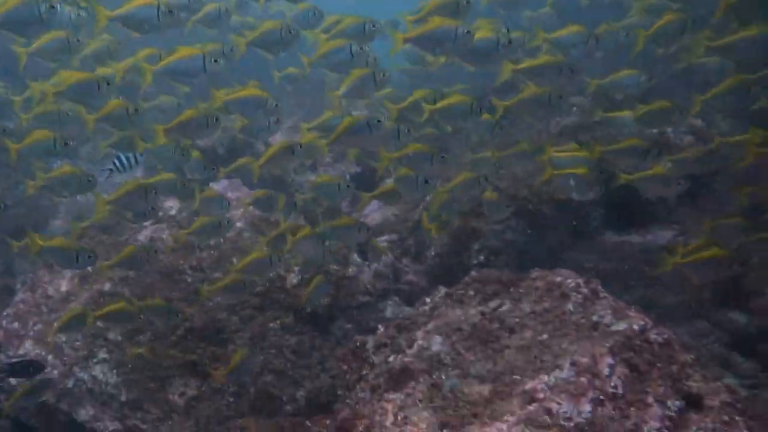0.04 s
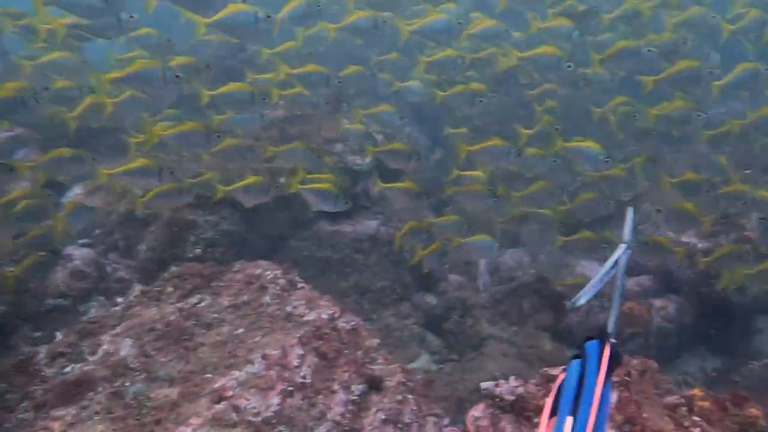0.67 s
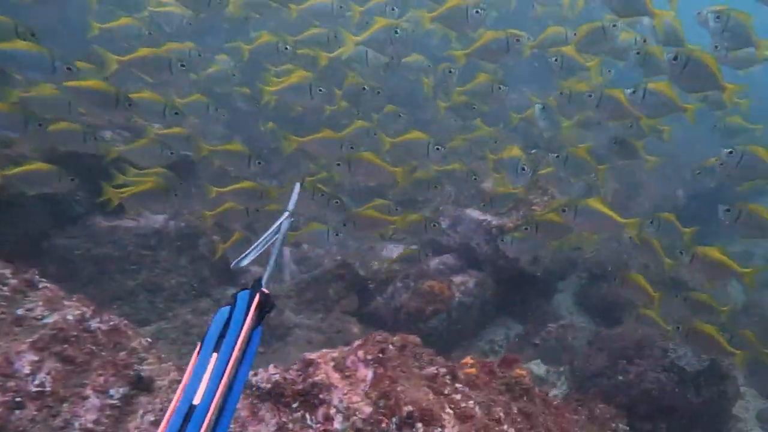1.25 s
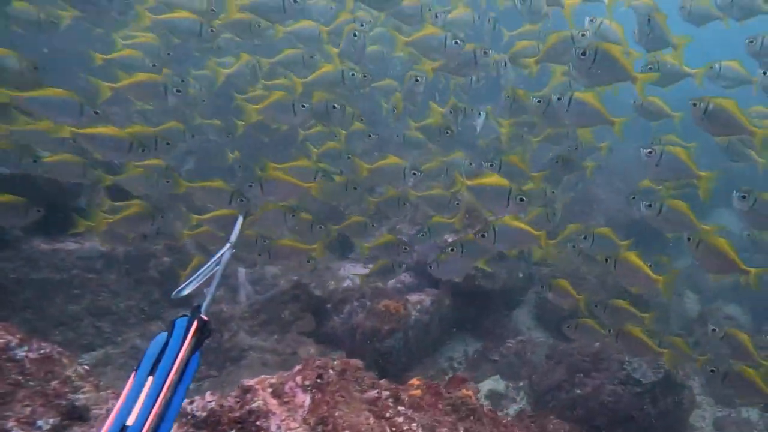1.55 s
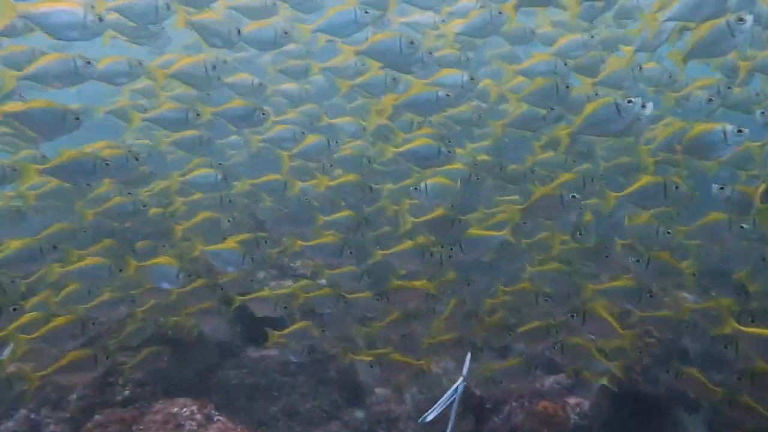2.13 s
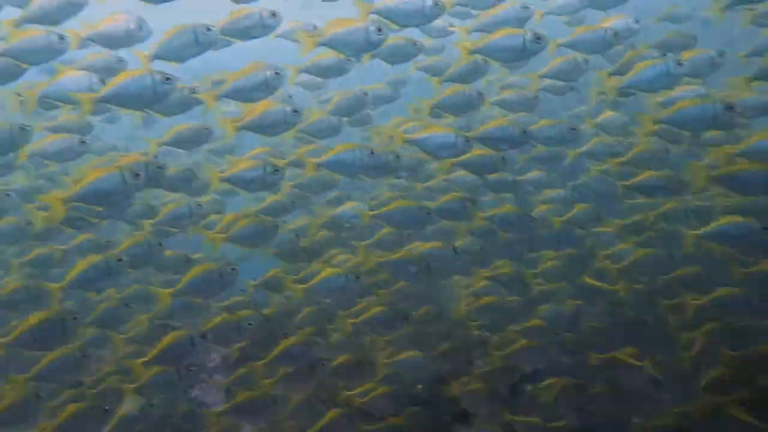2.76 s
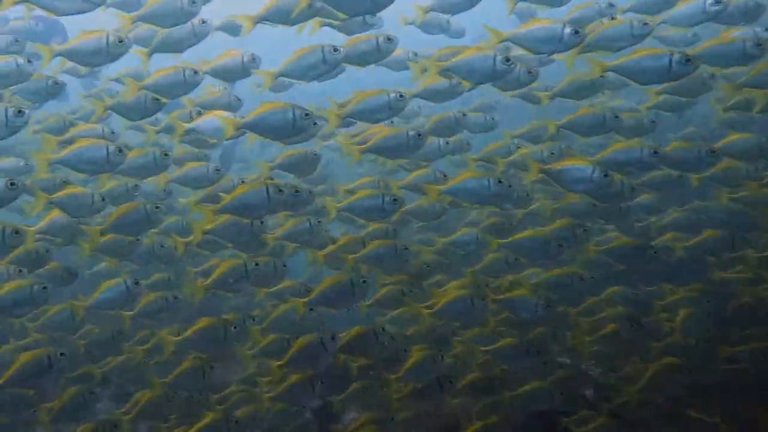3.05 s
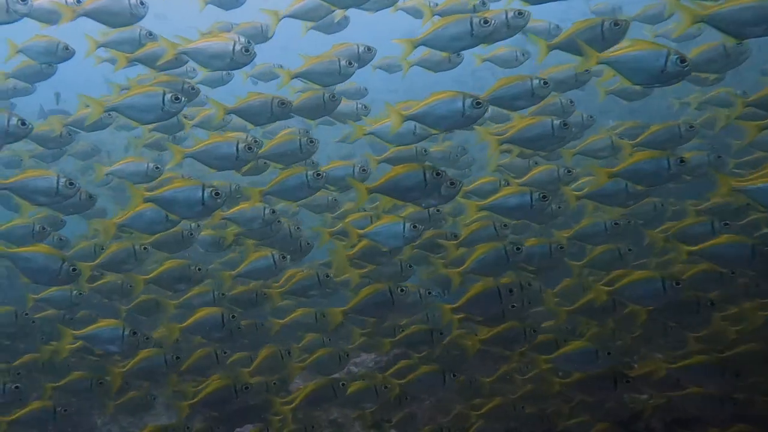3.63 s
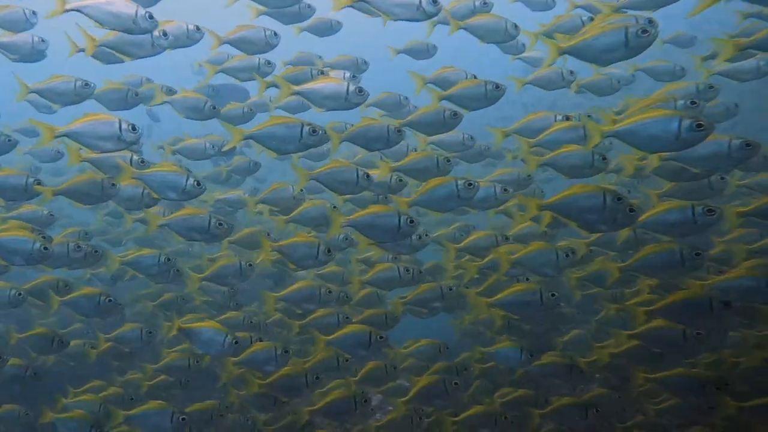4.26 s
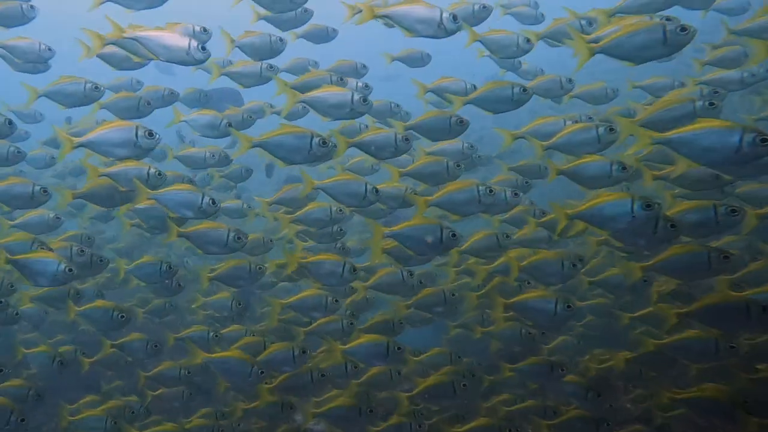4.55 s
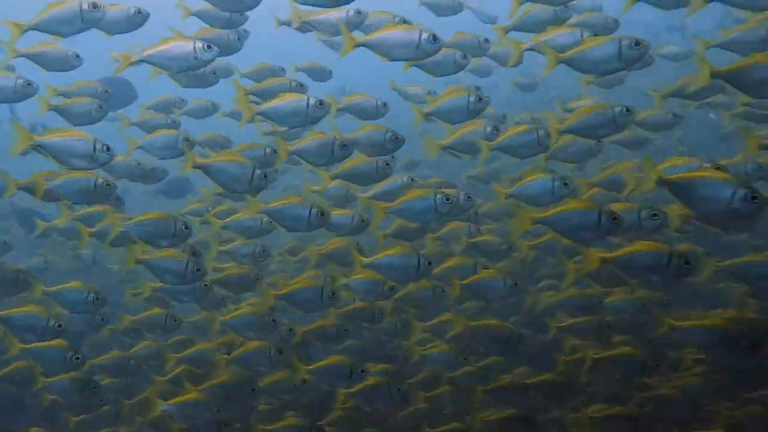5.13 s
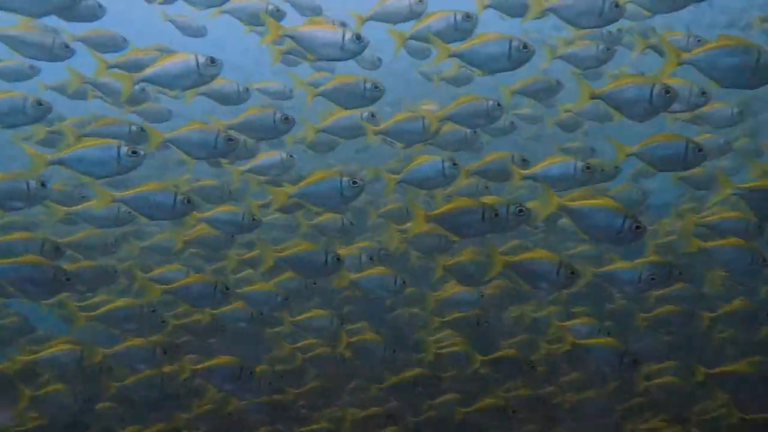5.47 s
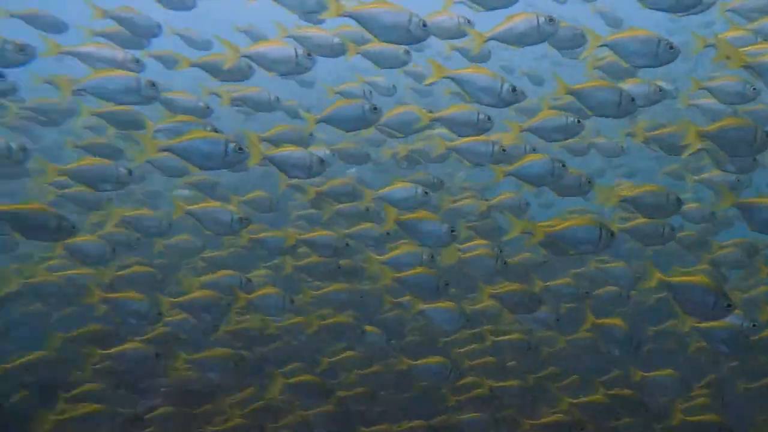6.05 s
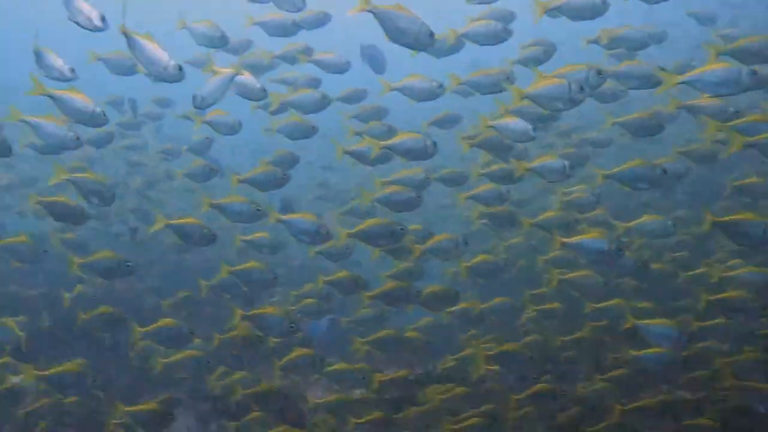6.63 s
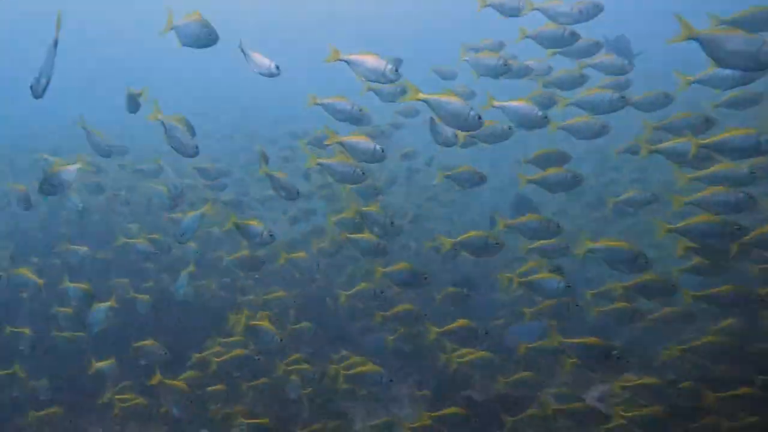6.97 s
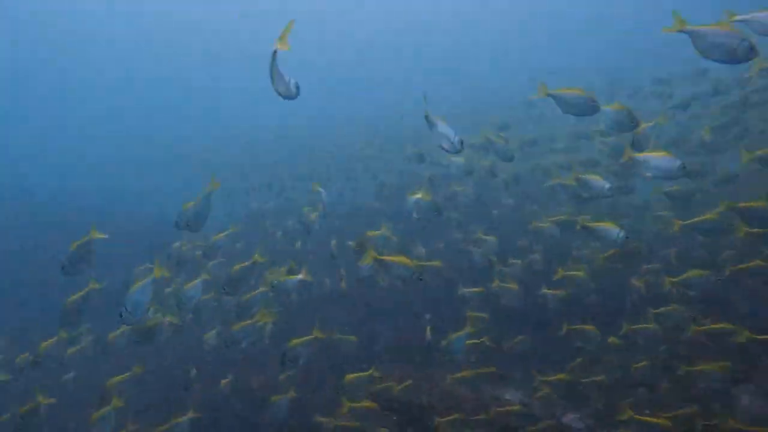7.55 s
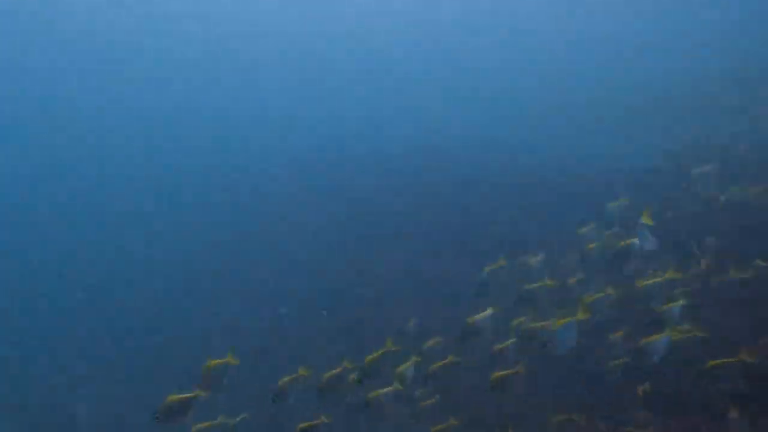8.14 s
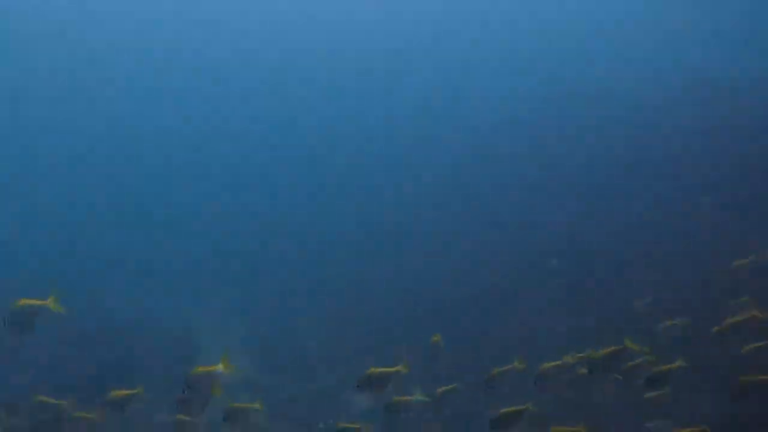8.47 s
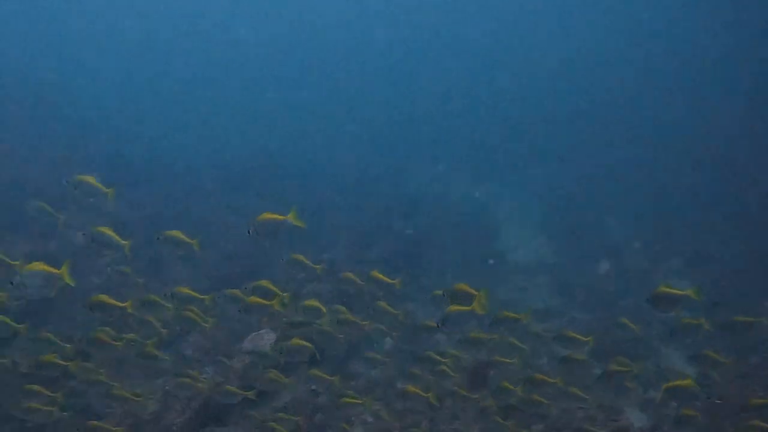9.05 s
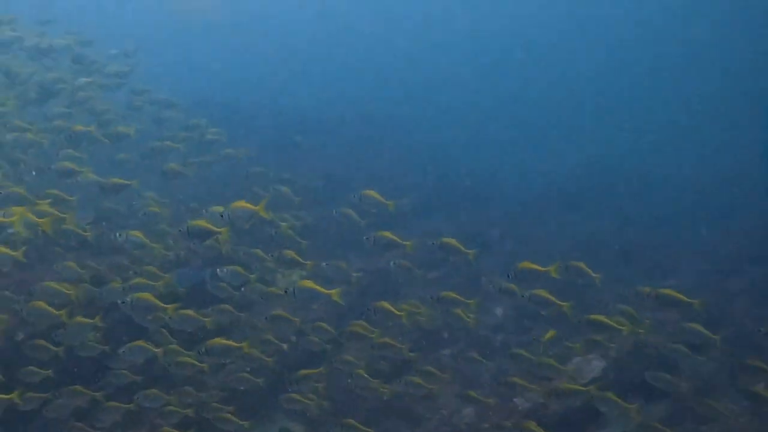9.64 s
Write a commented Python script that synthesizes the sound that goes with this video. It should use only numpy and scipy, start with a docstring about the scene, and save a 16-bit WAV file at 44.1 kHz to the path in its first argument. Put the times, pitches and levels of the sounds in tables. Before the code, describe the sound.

Shrimp crackle and snap underwater over low, muffled sloshing, with a few dull knocks, rubs and a faint warbling hum.

```python
"""Under water on a reef, heard through a diver's camera housing. Snapping shrimp crackle all round:
each snap is a collapsing bubble whose pressure pulse rings the resonances of the case wall.
Water sloshes and churns past the moving camera, and small ringing bubbles gurgle. Stick-slip rubs
and dull knocks come through the mount, light taps tick on the case, and a faint low hum warbles."""
import sys
import numpy as np
from scipy import signal
from scipy.fft import rfft, irfft, next_fast_len
from scipy.io import wavfile
from scipy.ndimage import uniform_filter1d, map_coordinates

SR = 44100
rng = np.random.default_rng(int(sys.argv[2]) if len(sys.argv) > 2 else 0)


def generate_wav(signal):
    """Clip the signal to [-1, 1] and save it as 16-bit WAV at the path in sys.argv[1]."""
    frames = np.transpose(np.atleast_2d(signal))
    scaled = np.clip(frames, -1, 1) * 32767
    pcm = np.round(scaled).astype(np.int16)
    wavfile.write(sys.argv[1], SR, pcm)


N = 432180

# rubs on the mount: (middle [s], length [s], level [dB], pitch [Hz], eddies relative to the rub [dB])
MOUNT_RUBS = [(0.123, 0.042, -40, 290, -11), (0.531, 0.027, -43, 278, 4), (0.609, 0.029, -47.5, 277, -4),
              (0.953, 0.037, -45, 274, -1), (1.055, 0.11, -40, 174.8, 3), (1.185, 0.26, -38, 162.5, -0.5),
              (1.289, 0.036, -47, 276, 0), (1.345, 0.11, -42, 152, 0), (1.652, 0.088, -45, 257.7, 1.5),
              (5.365, 0.037, -39, 240, -10), (7.667, 0.025, -51.5, 308, 7.5), (8.273, 0.02, -38, 277, -4),
              (8.345, .1, -50.5, 233, 9), (8.488, 0.038, -49, 266, 13), (9.54, 0.033, -49.5, 282, -2)]
RUB_TAPER = 0.44  # share of a rub spent swelling and fading


def amp(db):
    """Decibels to amplitude ratio."""
    return 10 ** (np.asarray(db) / 20)


def unit(x):
    """Normalisation to rms 1."""
    return x / np.sqrt(np.mean(x ** 2) + 1e-20)


def along(points, hz):
    """Interpolation of (frequency [Hz], value) points on a logarithmic axis."""
    f, v = np.transpose(points)
    return np.interp(np.log(hz + 1), np.log(f + 1), v)


def curve(points):
    """Linear interpolation of (time [s], value) points at every sample."""
    return np.interp(np.arange(N) / SR, *np.transpose(points))


def wobble(rate):
    """Smooth random modulation, rate knots a second."""
    return map_coordinates(rng.standard_normal(int(N * rate / SR) + 4), [np.arange(N) * rate / SR])


def swell(middle, length, taper):
    """A tapered window within the scene; taper is the share spent rising and falling."""
    inside = 1 - np.abs(np.arange(N) / SR - middle) / (length / 2)
    ramp = np.clip(inside / taper, 0, 1)
    return ramp * ramp * (3 - 2 * ramp)


def add(track, s, sound):
    """Superposition of a sound on the track from time s."""
    part = track[..., max(round(s * SR), 0):][..., :sound.shape[-1]]
    part += sound[..., :part.shape[-1]]


def filtered(x, response):
    """Linear filtering: the spectrum of x times a frequency response."""
    n = x.shape[-1]
    m = 2 * next_fast_len(n // 2 + 2048)
    return irfft(rfft(x, m) * response(np.fft.rfftfreq(m, 1 / SR)), m)[..., :n]


def coloured(x, spectrum):
    """Zero-phase filtering by (frequency [Hz], gain [dB]) points."""
    return filtered(x, lambda hz: amp(along(spectrum, hz)))


def causal(gain):
    """The minimum-phase response with this gain: it rings after a blow, never before."""
    cepstrum = irfft(np.log(np.maximum(gain, 1e-6)))
    half = len(cepstrum) // 2
    cepstrum[1:half] *= 2
    cepstrum[half + 1:] = 0
    return np.exp(rfft(cepstrum))


def resonance(hz, centre, width):
    """Gain of a steep-sided resonance."""
    return 1 / (1 + ((hz ** 2 - centre ** 2) / (width * hz + 1e-9)) ** 2)


def housing(hz, lowest_hz=1250):
    """Modal response of the wall at the two ports; stiffness blocks sound below the first mode."""
    # wall resonances: (frequency [Hz], width [Hz], left gain [dB], right gain [dB])
    modes = [(1590, 360, -8.5, -7.5), (2160, 430, -14, -14), (2780, 270, -7, -8), (3170, 450, 0, -10),
             (3910, 810, -6, -13), (4830, 1100, -16, -9), (5200, 470, -1.5, -4), (5790, 590, -13, -9),
             (6440, 740, -6, -5), (7430, 850, -4, -5), (8470, 750, -20, -19), (9680, 1270, -22, -22),
             (10990, 1730, -22, -26), (12770, 1990, -29, -30)]
    # the wall bends differently at the two ports: (frequency [Hz], left phase lead [rad])
    phase_lead = [(1000, -.9), (1350, -.1), (1800, -.4), (2200, -1.3), (3050, -1), (3400, 0), (3700, 3),
                  (4000, 4.7), (4700, 5.9), (5600, 2 * np.pi)]
    left = np.sqrt(sum((amp(db) * resonance(hz, c, w)) ** 2 for c, w, db, _ in modes)) + 1e-9
    right = np.sqrt(sum((amp(db) * resonance(hz, c, w)) ** 2 for c, w, _, db in modes)) + 1e-9
    stiffness = np.minimum(hz / lowest_hz, 1) ** 2
    right_over_left = right / left * np.exp(-1j * along(phase_lead, hz))
    return causal(left * stiffness) * np.array([np.ones_like(hz), right_over_left])


def through_wall(pair):
    """Transmission of two incoherent drives: one shared by the ports, one in antiphase."""
    # antiphase drive: (frequency [Hz], side relative to mid [dB])
    side_spectrum = [(1000, 1.5), (1600, -12), (3000, -5), (5200, -14.5), (7500, -17), (9500, -10),
                     (13000, -2.5)]
    mid, side = pair[:1], coloured(pair[1:], side_spectrum)
    return filtered(mid + side * [[1], [-1]], housing)


def snap_envelope(t, rise_s=0.00012, burst_t60=0.0087, rocks_t60=0.22, surface_s=.015, surface_t60=0.027):
    """Cavitation: a collapsing bubble's burst, its scatter off rocks and its smeared surface echo."""
    burst = amp(-60 * t / burst_t60)
    rocks = amp(-26 - 60 * t / rocks_t60)
    surface = (t > surface_s) * amp(-19 - 60 * np.abs(t - surface_s) / surface_t60)
    return (1 - np.exp(-t / rise_s)) * (burst + np.hypot(rocks, surface))


def reef_crackle(snaps_per_s=430, spread_db=7.5, flurry_db=2, colour_db=2.5, gain_db=1):
    """Incoherent summation: snaps at all distances add in energy, and the farthest merge into hiss."""
    # distant crackle: (time [s], relative level [dB])
    levels = [(0.0, -44.5), (0.41, -46.5), (1.06, -43), (1.36, -45), (3.14, -42), (3.41, -40.5),
              (3.82, -43.5), (4.56, -41), (4.86, -42.5), (5.62, -41.5), (5.81, -43.5), (6.66, -41.5),
              (7.2, -43), (7.45, -40.5), (7.78, -43), (8.19, -41.5), (8.71, -43), (9.8, -40.5)]
    onsets = rng.random(N) < snaps_per_s / SR
    size = np.minimum(rng.standard_normal(N), 1.35)
    energy = onsets * amp(spread_db * size) ** 2
    energy_decay = snap_envelope(np.arange(SR // 25) / SR) ** 2
    bursts = np.sqrt(np.abs(signal.fftconvolve(energy, energy_decay)[:N]))
    flurries = amp(flurry_db * wobble(30)) * unit(bursts)
    hiss = amp(-1.5 + 0.68 * wobble(12))
    # small bubbles barely stir the lowest wall resonances
    noise = coloured(rng.standard_normal((2, N)), [(1700, -2.5), (2700, 0), (8000, 1)])
    dull = filtered(noise, lambda hz: along([(3800, 0.74), (5000, 0.019)], hz))
    tilt_db = colour_db * wobble(70)  # some snaps dull, some bright
    tilted = dull * amp(tilt_db) + (noise - dull) * amp(-.3 * tilt_db)
    crackle = through_wall(np.hypot(flurries, hiss) * tilted)
    return amp(curve(levels) + gain_db) * unit(crackle)


def flow(surge_stir_db=-27):
    """Slosh and churn amplitudes: drift and surges add in power; surges and rubs shed eddies."""
    # steady slosh: (time [s], relative level [dB])
    drift = [(0.0, -41.5), (0.84, -45), (1.47, -37.5), (4.2, -50.5), (9.31, -37.5), (9.8, -60)]
    # surges as the camera swings: (middle [s], length [s], relative level [dB])
    surges = [(0.2, 0.25, -29.5), (1.55, 0.16, -24), (1.856, 0.25, -35), (2.428, 0.26, -31.5),
              (5.78, .12, -42), (6.134, 0.46, -35), (8.26, 0.49, -39), (8.633, 0.19, -30),
              (9.183, 0.31, -27), (9.708, 0.41, -35.5)]
    # steady eddies: (time [s], relative level [dB])
    eddies = [(0, -48), (1.9, -47), (2.05, -47.5), (2.3, -50.5), (3.55, -46.5), (3.64, -54.5), (3.73, -48),
              (5.2, -49), (6.1, -50), (6.7, -47), (7.1, -50.5), (7.45, -47.5), (7.8, -46.5), (9.8, -45.5)]
    surge = sum(amp(db) * swell(middle, length, 0.9) for middle, length, db in surges)
    rubbing = sum(amp(db + stir_db) * swell(middle, length, RUB_TAPER)
                  for middle, length, db, _, stir_db in MOUNT_RUBS)
    slosh = np.hypot(amp(curve(drift)), surge)
    churn = np.hypot(amp(curve(eddies)), amp(surge_stir_db) * surge + rubbing)
    return slosh, churn


def water(slosh_db=1, churn_db=-1, lumps_db=4):
    """Turbulence round the moving camera: slow pressure swings and lumpy eddies."""
    # pressure swings: (frequency [Hz], spectral level [dB])
    slosh_spectrum = [(4, -6), (10, 10.5), (17, 4), (26, -6.5), (48, -8.5), (70, -32), (120, -63),
                      (300, -80)]
    # eddies: (frequency [Hz], spectral level [dB])
    churn_spectrum = [(35, -2), (60, 4), (90, 4), (125, 8), (170, 4), (250, -0.5), (310, -12), (380, -22),
                      (500, -32.5), (720, -30.5), (1100, -29.5), (2000, -31), (4000, -65), (8000, -110)]
    slosh, churn = flow()
    swings = unit(coloured(rng.standard_normal(N), slosh_spectrum))
    lumpy_noise = rng.standard_normal(N) * amp(lumps_db * wobble(35))
    eddies = unit(coloured(lumpy_noise, churn_spectrum))
    return amp(slosh_db) * slosh * swings + amp(churn_db) * churn * eddies


def wash(level_db=-64):
    """Ambient noise: a faint rush of water, uncorrelated between the ports."""
    # rush of water: (frequency [Hz], spectral level [dB])
    spectrum = [(20, -25), (50, 7), (150, 5.5), (300, 10.5), (500, 0), (1000, 2.5), (2000, -8)]
    return amp(level_db) * unit(coloured(rng.standard_normal((2, N)), spectrum))


def whitened(burst, bins=25):
    """Spectral whitening of a noise burst, since a collapse is one clean, broadband pulse."""
    spectrum = rfft(burst)
    power = np.abs(uniform_filter1d(np.abs(spectrum) ** 2, bins, axis=-1))
    return irfft(spectrum / np.sqrt(power + 1e-12), burst.shape[-1])


def neighbour_snaps(per_s=7, median_hz=5270, pitch_spread=0.48, focus_db=4):
    """A random point process: rows for near_snaps from shrimp a little farther off."""
    count = int(per_s * N / SR)
    rows = []
    for when, (loudness, low_ring, detune) in zip(rng.random(count), rng.standard_normal((count, 3))):
        s = when * (N / SR - .1)
        pitch = median_hz * np.exp(pitch_spread * detune)
        rows.append((s, -26.5 + loudness, -8 + 5 * low_ring, pitch, focus_db, 2.07 * pitch))
    return rows


def near_snaps(gain_db=-7, focus_width=0.32, leak_db=-15, treble_fade_db_per_s=3500):
    """Impulse excitation of the wall by single collapses; big, slow bubbles ring low, with little treble."""
    # nearest snaps and their strongest echoes: (time [s], relative level [dB], lift of the low ring [dB],
    # pitch [Hz], emphasis of that pitch [dB], upper edge [Hz])
    snaps = [(0.0511, -9.0, -5.5, 5200, 4.5, 10000), (0.0944, -20, -5, 3720, 7, 4700.0),
             (0.1111, -22.5, -5, 2550.0, 10, 15400.0), (0.1995, -16, -3, 7200, 5.5, 15600.0),
             (0.2757, -10.5, -8, 7540, 7.5, 7760), (0.454, -21, -14, 2830, 12, 7300.0),
             (0.5434, -16, 2, 3050.0, 7, 9500.0), (0.5643, -15.5, -5, 5400.0, 7, 14100.0),
             (0.7832, -30, 14.0, 2800, 0, 4000.0), (0.8396, -21.5, -1, 2750, 20, 3000.0),
             (0.9798, -23, -19, 7400, 21, 8000.0), (1.1072, -19.5, -21, 8300, 10.0, 15800.0),
             (1.1957, -12.5, -16, 2350.0, 8, 9300), (1.2089, -24, -14, 5400.0, 9, 7200.0),
             (1.2343, -31, 21, 4300.0, 9, 7400.0), (1.3488, -20.5, -8, 6950, 0, 9200.0),
             (1.7645, -21.0, -18.0, 7950.0, 11.0, 10200.0), (1.8448, -16.5, -13.0, 3020, 12.0, 6000.0),
             (1.8558, -14, 18.5, 3700.0, 14, 14800.0), (1.8668, -39, 3, 4350.0, 11, 5600.0),
             (1.9572, -18, -18.0, 5850.0, 7, 15700.0), (2.0417, -21.0, -11, 2850.0, 5.0, 15300.0),
             (2.0721, -22, -2, 5400.0, 5, 9300.0), (2.1107, -22.0, -3.0, 4400, -1, 6000.0),
             (2.2972, -20.5, -17.0, 3050.0, 5, 8300.0), (2.3597, -24, -8.0, 5500.0, 5.0, 7600.0),
             (2.3711, -15.0, -3, 7850.0, 6, 8600.0), (2.3851, -22.0, -7.0, 3450.0, 13, 8200.0),
             (2.5855, -17, -3, 7100.0, 5, 9300.0), (2.6065, -30, 6, 3450.0, 12, 9400.0),
             (2.623, -18, -4, 2750.0, 6, 9300.0), (2.6936, -27, 9, 6900.0, 3, 14500.0),
             (2.8345, -21.5, -12, 4800.0, 9.0, 12500.0), (3.0805, -21.5, -24, 2850.0, 5.0, 10900.0),
             (3.1215, -21, -8, 7050.0, 9.0, 15900.0), (3.2464, -28, -16.0, 9500.0, 12, 14300.0),
             (3.2619, -12.5, -23, 2320, 9, 10600), (3.407, -19.5, 4, 5500.0, 10.0, 10300.0),
             (3.4505, -23, -8, 2950.0, 13, 9600.0), (3.588, -22, -6.0, 8400.0, 10.0, 8800.0),
             (3.6026, -22.0, -11.0, 3400.0, 5, 11000.0), (3.6346, -16.5, -6.0, 7900, 4, 16000.0),
             (3.8568, -24, -6, 7400.0, 17, 11200.0), (3.8705, -21.5, -6, 2670, 12.0, 14000.0),
             (4.1478, -25.5, -22, 2850.0, -1, 10900.0), (4.2424, -20, 1, 5500.0, 12.0, 13600.0),
             (4.255, -21.5, -8, 4650.0, 7.0, 12800.0), (4.3435, -17, 24.0, 3450.0, 12, 14900.0),
             (4.3617, -18.5, -3, 2800.0, 8.0, 7100.0), (4.3807, -20.5, 7, 5850.0, 5, 14900.0),
             (4.4467, -22, -13, 3000.0, 4.0, 8400.0), (4.5093, -20, -3, 2930, 13, 6700.0),
             (4.5183, -19, -4, 2740, 18, 15800.0), (4.528, -14.0, 3.5, 4700.0, 9, 14700.0),
             (4.5768, -19.5, 1, 2550.0, 12, 11400.0), (4.7203, -21.5, -4, 3430, 19, 14600.0),
             (4.7898, -23.5, -18.0, 2450.0, 11.0, 6500.0), (4.8037, -18, -6.0, 3050.0, 3, 7900.0),
             (4.9315, -23.5, -2, 8250, 22, 16000.0), (5.0417, -21, -11, 8840, 4, 10500.0),
             (5.087, -26.5, 10, 2400, 17, 5200.0), (5.1368, -23.5, -5, 2930, 13.0, 6400.0),
             (5.2258, -21.5, -13, 2450.0, 13.0, 6400.0), (5.2796, -13, -13, 7650.0, 7.0, 9700.0),
             (5.2947, -18.5, -13.0, 5800.0, 6, 16000.0), (5.3432, -23, -2, 4450.0, 7.0, 11100.0),
             (5.4638, -23.5, -2, 4300.0, 3, 10900.0), (5.5198, -16.5, -16, 8140, 12.0, 15200.0),
             (5.5502, -18.5, -4, 3900.0, 5.0, 6800.0), (5.5813, -21.5, -13, 7200.0, 6, 10800.0),
             (5.6117, -23, -2, 2600.0, 15, 11100.0), (5.695, -19, -21, 3550.0, 4, 6800.0),
             (5.8108, -22.5, -8, 4900, 0, 6600.0), (5.8283, -17, 17.0, 2900, 7, 4100.0),
             (5.8463, -22, 0, 5750, 6, 7700.0), (5.9919, -16.5, -4, 2850.0, 1, 6160),
             (6.0005, -19, -1, 2700.0, 9, 14800.0), (6.2297, -19, -15, 2700.0, 8, 11900.0),
             (6.2505, -19.0, 1, 4900.0, 11, 13300.0), (6.3109, -21, -16.0, 7950.0, 5, 15700.0),
             (6.3732, -16.5, -10.0, 7700.0, 9, 16000.0), (6.3877, -23, -12, 3500.0, 7, 13600.0),
             (6.4117, -22, -12, 2850.0, 5, 8000.0), (6.4305, -20.5, 3.0, 7450.0, 10.0, 16000.0),
             (6.5228, -22, -1.0, 2350.0, 10.0, 7000.0), (6.5557, -21.5, -4.0, 4900, 1, 6600.0),
             (6.5824, -21.0, -4, 4550.0, 4, 8100.0), (6.6588, -21.5, -18.0, 2830, 10, 9800.0),
             (6.6676, -20.5, -4, 5450.0, 6.0, 10600.0), (6.7308, -18, -17, 2600.0, 19, 4500.0),
             (6.7904, -19, -20, 2700.0, 6, 6700.0), (6.9428, -20.5, -5, 2850.0, -1, 5400.0),
             (7.2075, -21.5, -18.0, 2650.0, 9.0, 9600.0), (7.2225, -22, -6, 7300.0, 1, 10700.0),
             (7.4202, -23.0, 3, 6400.0, 4, 7500.0), (7.5203, -29, -3, 3450.0, 5, 5200.0),
             (7.622, -16, -15, 7100.0, 8.0, 15800.0), (7.6304, -19, 0, 2750.0, 1, 7400.0),
             (7.7931, -20, -4, 8800, 8.0, 15100.0), (7.8378, -26, -10.0, 2900.0, 14.0, 5600.0),
             (7.8636, -28.5, 16, 3150.0, 6.0, 5300.0), (7.9351, -23.5, -18, 9000, 12, 12500.0),
             (7.9948, -22.5, -20, 5850.0, 11, 7700.0), (8.0326, -21.0, -5.0, 7200.0, 12, 12900.0),
             (8.0418, -18.5, -0.5, 4250.0, 4.0, 8700.0), (8.0516, -23, -10.0, 8150.0, 8, 16000.0),
             (8.0803, -18.5, 0, 3800.0, 3, 6800.0), (8.1458, -18.0, 4, 3270, 10, 9300.0),
             (8.1913, -18.0, -9, 2540, 11, 6200.0), (8.2145, -18, -1.0, 5100, 1, 6940),
             (8.2934, -19.0, -1, 4650.0, 7, 15600.0), (8.309, -24, 17, 3150.0, 4, 13500.0),
             (8.34, -21, -3.0, 5900, 4, 7900.0), (8.353, -18, 0.0, 3100.0, 6, 5700.0),
             (8.3775, -14, -7, 5440, 7, 8950), (8.4883, -26.5, 25, 5300.0, 9, 13800.0),
             (8.5629, -20, -1, 3050.0, 4, 5300.0), (8.6209, -19.5, -5, 8300, 10.0, 10600.0),
             (8.7519, -27, 7, 3250.0, 14, 11100.0), (8.9341, -16, 11, 2820, 12, 15800.0),
             (8.9754, -19.5, 5.0, 4950.0, 11.0, 11800.0), (9.0321, -25, -15, 2950.0, 12.0, 4400.0),
             (9.086, -17.5, 0.5, 4050.0, 1, 8900.0), (9.1158, -20, -10, 2300.0, 11, 7700.0),
             (9.3131, -30, 26.0, 8700.0, 8.0, 12600.0), (9.3578, -21, -5, 4900, 2, 6600.0),
             (9.4229, -9.5, 4.5, 4900, 4, 5450), (9.4304, -33, 14.0, 3550.0, 3.0, 4800.0),
             (9.439, -27, 7, 4700.0, 3, 4800.0), (9.4798, -12.5, -5, 8500, 4, 10000.0),
             (9.4951, -23, -6, 7000.0, 3, 8800.0), (9.5028, -29, 19, 6900.0, 3.0, 13200.0),
             (9.5579, -15.5, -9, 2650.0, 9, 11300.0), (9.5669, -23, -2, 3300.0, -1, 9300.0),
             (9.5809, -24, 0, 2950.0, 8, 10300.0)]
    lead_s, pulse_s = .001, .0014
    t, out = np.maximum(np.arange(SR // 25) / SR - lead_s, 0), np.zeros((2, N))
    for s, db, low_db, pitch, focus_db, edge_hz in snaps + neighbour_snaps():
        def response(hz):
            """Spectrum of one collapse: a hump at its pitch and a shelf above its upper edge."""
            colour_db = along([(2000, low_db), (3700, 0), (8200, 0), (11500, 8)], hz)
            hump_db = focus_db * resonance(hz, pitch, focus_width * pitch)
            shelf = np.sqrt(1 / (1 + (hz / edge_hz) ** 14) + amp(leak_db) ** 2)
            return causal(amp(colour_db + hump_db) * shelf)

        collapse = whitened(rng.standard_normal((2, len(t))) * snap_envelope(t))
        burst = filtered(collapse, response)
        treble = filtered(burst, lambda hz: along([(8000, 0), (10000, 1)], hz))
        ring = through_wall(burst - treble * (1 - amp(-treble_fade_db_per_s * t)))  # echoes are duller
        pulse_rms = np.sqrt(np.sum(ring ** 2) / (2 * SR * pulse_s))
        add(out, s - lead_s, amp(db + gain_db) * ring / pulse_rms)
    return out


def rubs(scrape_db=-12, sag_octaves=0.12, jitter=.05, rough_db=2.3):
    """Stick-slip friction: a short, gritty groan whose uneven pitch sags as the grip lets go."""
    # grit heard through the mount: (frequency [Hz], spectral level [dB])
    grit_spectrum = [(150, -1.5), (270, 4), (410, -9.5), (500, -17), (800, -35), (1200, -55), (3000, -100)]
    out = np.zeros(N)
    unevenness = jitter * wobble(110)
    grip = amp(rough_db * wobble(90))
    scrape = amp(scrape_db) * unit(coloured(rng.standard_normal(N), grit_spectrum))
    for middle, length, db, pitch, _ in MOUNT_RUBS:
        pressure = swell(middle, length, RUB_TAPER)
        span = np.flatnonzero(pressure)
        slip_hz = pitch * 2 ** (-sag_octaves * (span / SR - middle) / length) * (1 + unevenness[span])
        slips = np.sqrt(2) * np.sin(2 * np.pi * np.cumsum(slip_hz) / SR)
        out[span] += amp(db) * pressure[span] * grip[span] * (slips + scrape[span])
    return out


def gurgles(gain_db=-0.5, bubbles_per_s=180, pitch_spread=.13, decay_cycles=22, rise=0.078):
    """Bubble resonance: small bubbles ring one over another, each rising a little in pitch as it dies."""
    # bubble clusters: (middle [s], length [s], relative level [dB], pitch [Hz])
    clusters = [(0.145, 0.073, -56.5, 800), (0.48, 0.15, -66, 670), (0.663, 0.062, -69, 720),
                (2.442, .09, -67, 715), (2.879, .2, -45.5, 239), (2.94, .15, -64, 740),
                (3.726, 0.16, -55, 260), (4.227, 0.04, -58, 880), (6.559, .13, -63, 784),
                (6.81, 0.15, -68, 720), (9.317, 0.058, -56.5, 775), (9.729, .06, -56.5, 770)]
    t, out = np.arange(SR // 10) / SR, np.zeros(N)
    for middle, length, db, pitch in clusters:
        count, cluster = int(bubbles_per_s * length) + 1, np.zeros(N)
        for when, detune in zip(rng.random(count), rng.standard_normal(count)):
            hz = pitch * np.exp(pitch_spread * detune)
            age = np.minimum(t * hz / decay_cycles, 2)
            envelope = (1 - np.exp(-t * hz)) * amp(-60 * age)
            bubble = envelope * np.sin(2 * np.pi * hz * t * (1 + rise * age / 2))
            add(cluster, middle + (when - .5) * length - 2 / hz, bubble)
        cluster *= swell(middle, length, 0.49)
        out += amp(db + gain_db) * cluster / np.sqrt(np.sum(cluster ** 2) / (SR * length / 2) + 1e-20)
    return out


def taps(width_hz=290, t60=.08):
    """Damped resonance: a light touch on the case gives a short, hollow tick."""
    # soft taps: (time [s], peak level [dB], pitch [Hz])
    touches = [(0.217, -49, 750), (1.06, -50.5, 680), (1.167, -56, 680), (1.286, -55, 700),
               (2.096, -51, 695), (2.213, -54, 720), (8.489, -48, 790), (8.935, -46.5, 900),
               (9.423, -45.5, 850)]
    t, out = np.arange(SR // 8) / SR, np.zeros(N)
    for s, db, ring_hz in touches:
        burst = rng.standard_normal(len(t)) * amp(-60 * t / t60)
        tick = filtered(burst, lambda hz: resonance(hz, ring_hz, width_hz))
        add(out, s, amp(db) * tick / np.abs(tick).max())
    return out


def knocks():
    """Impact excitation: each push rings the water-damped mount; a longer contact is duller."""
    # knocks on the mount: (time [s], peak level [dB], contact time [s])
    impacts = [(0.218, -36, 0.0003), (0.948, -28.5, 0.0093), (1.5111, -9, 0.0014), (1.519, -21, 0.0014),
               (1.527, -18, 0.0038), (1.542, -20.5, 0.012), (1.753, -29, 0.00059), (1.7564, -15.5, 0.0044),
               (5.738, -19, 0.0044), (5.766, -21, 0.0026), (5.769, -24.5, 0.013), (5.798, -24, 0.004),
               (6.9, -27.5, 0.007), (8.228, -20, 0.0038), (8.231, -27, 0.015), (8.462, -26, 0.0037)]
    # mount resonances: (frequency [Hz], width [Hz], gain [dB])
    modes = [(59, 35, -12), (150.5, 92, -2), (271.5, 70, 2), (433, 16, -18), (604, 32, -17.5),
             (743, 78, -19)]
    t, out = np.arange(SR // 8) / SR, np.zeros(N)
    mount = lambda hz: causal(sum(amp(db) * resonance(hz, c, w) for c, w, db in modes))
    for s, db, contact in impacts:
        force = np.sin(np.pi * np.minimum(t / contact, 1)) ** 2
        thud = filtered(force, mount)
        add(out, s, amp(db) * thud / np.abs(thud).max())
    return out


def hum(warble_hz=5.792, overtone_db=-15):
    """Frequency and amplitude modulation: a muffled, throbbing hum jumps up in pitch once a cycle."""
    # strength of the hum: (time [s], relative level [dB])
    levels = [(2, -60), (2.3, -43), (3.56, -42), (3.64, -54), (3.72, -41), (5.6, -38.5), (9.8, -44)]
    # one warble: (position in the cycle [0-1], pitch [Hz], relative level [dB])
    warble = [(0, 172, 5), (.08, 178, 1), (.16, 135, -5), (.25, 123, -1.5), (.5, 121, -.5), (.72, 121, -1),
              (.86, 125, -5), (.94, 155, 3)]
    position, pitch_hz, throb_db = np.transpose(warble)
    cycle = (np.arange(N) / SR - .0925) * warble_hz + .025 * wobble(7)
    pitch = np.interp(cycle, position, pitch_hz, period=1) * (1 + .02 * wobble(60))
    phase = 2 * np.pi * np.cumsum(pitch) / SR
    waver_db = 2 * wobble(9) + 2 * wobble(55)
    envelope = amp(curve(levels) + np.interp(cycle, position, throb_db, period=1) + waver_db)
    tone = envelope * (np.sin(phase) + amp(overtone_db) * np.sin(2 * phase))
    return coloured(tone, [(255, -5.5), (330, -58)])


def scene():
    """Superposition at the ports: long waves squeeze the whole case and reach both nearly alike."""
    low = water() + knocks() + taps() + gurgles() + rubs() + hum()
    eddies = amp(-17) * water() * [[1], [-1]]  # small eddies differ from port to port
    return near_snaps() + reef_crackle() + low * amp([[.25], [-.25]]) + eddies + wash()


def record(dry, top_hz=15800):
    """Band limiting: the camera rolls off the high treble and keeps nothing above its limit."""
    return filtered(dry, lambda hz: amp(along([(13000, 0.5), (15500, -13)], hz)) * (hz < top_hz))


dry = scene()
out = record(dry)
generate_wav(out)
```